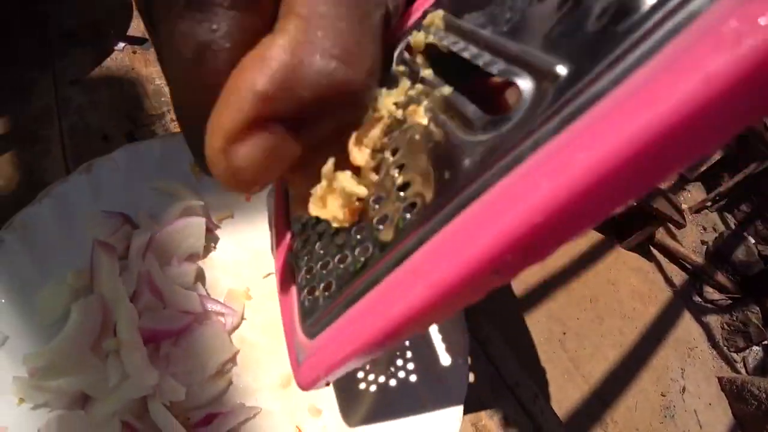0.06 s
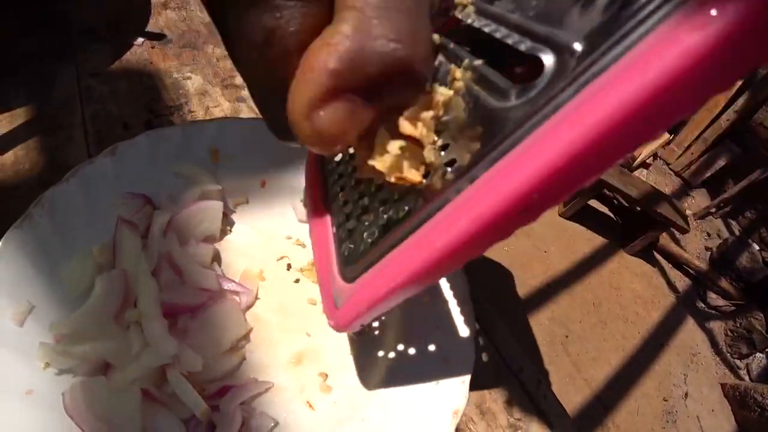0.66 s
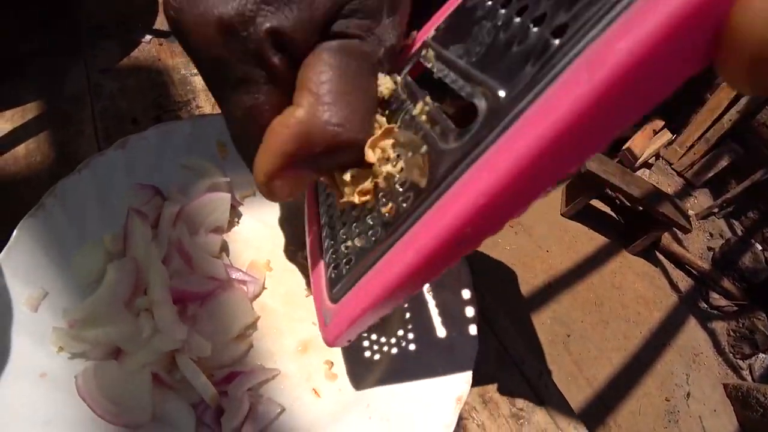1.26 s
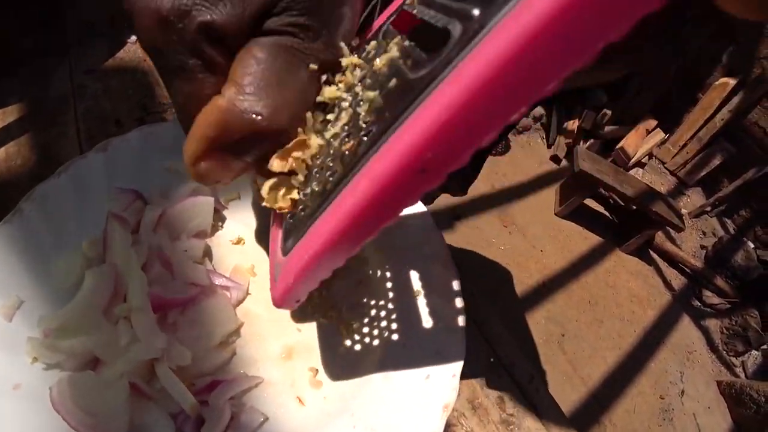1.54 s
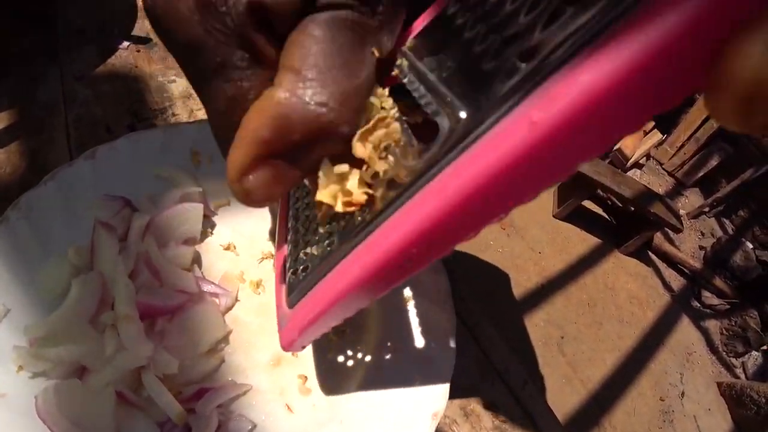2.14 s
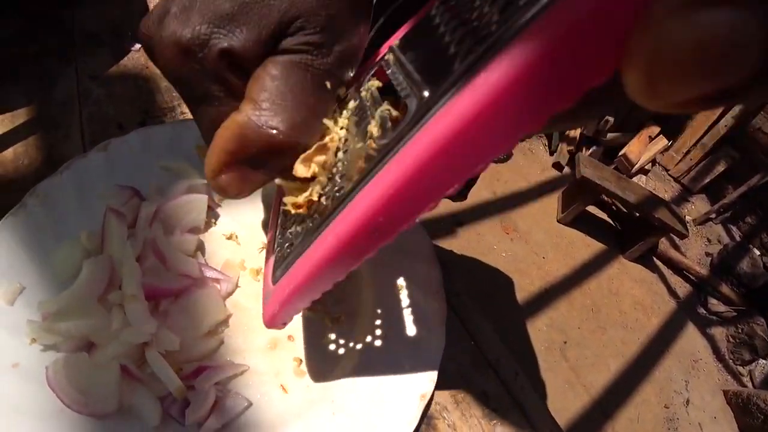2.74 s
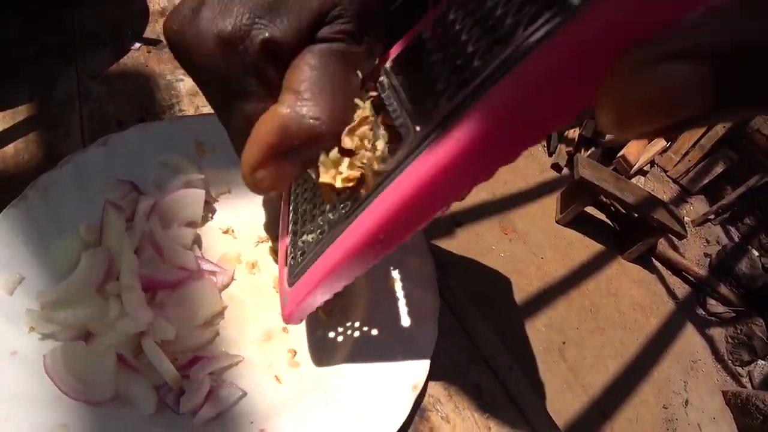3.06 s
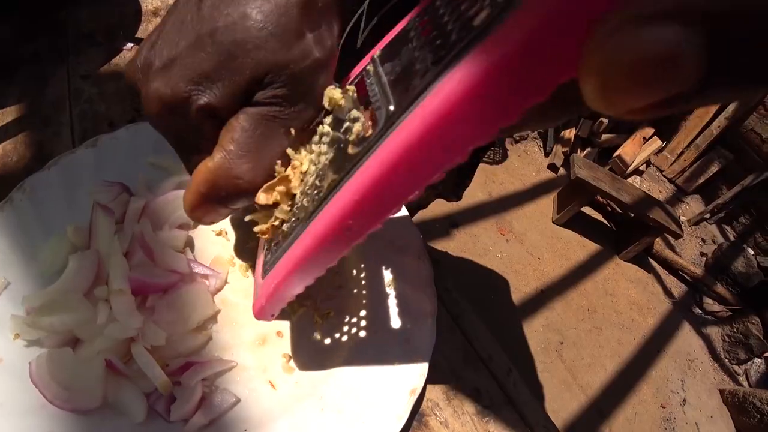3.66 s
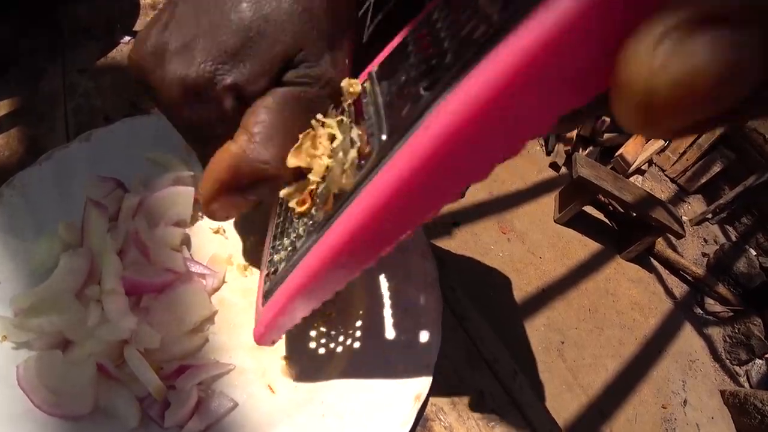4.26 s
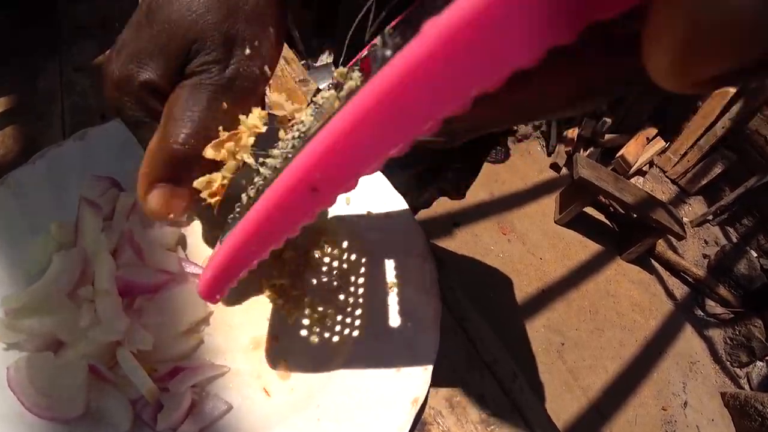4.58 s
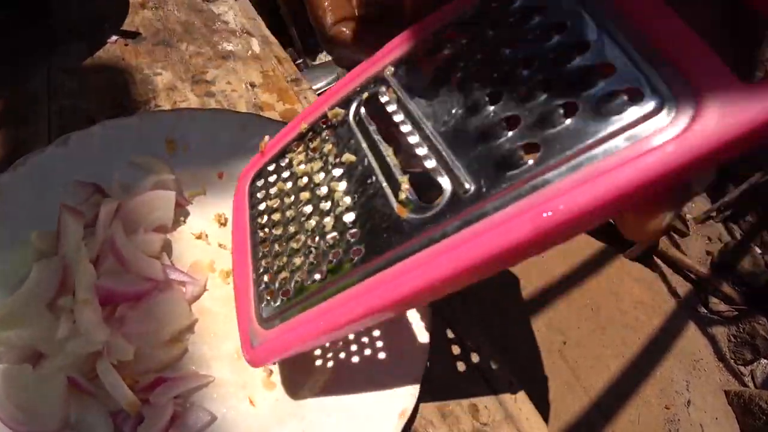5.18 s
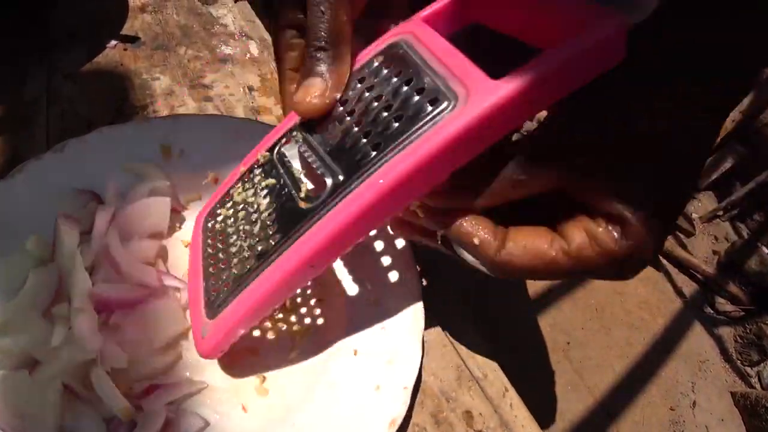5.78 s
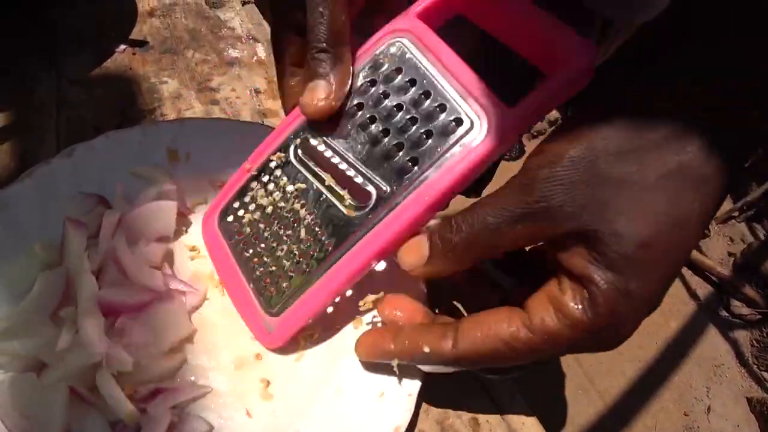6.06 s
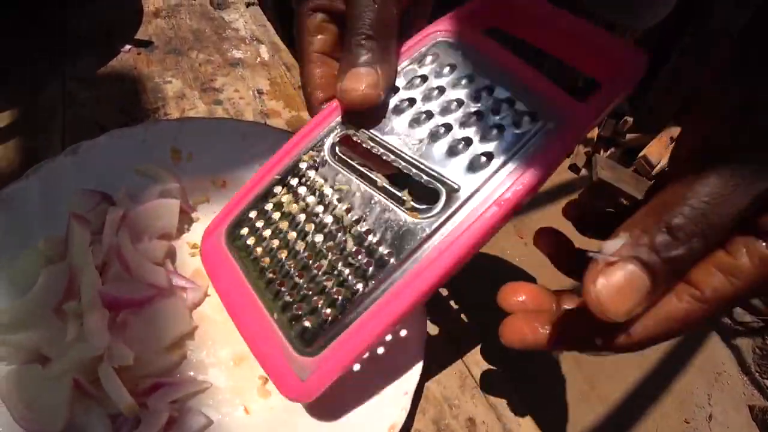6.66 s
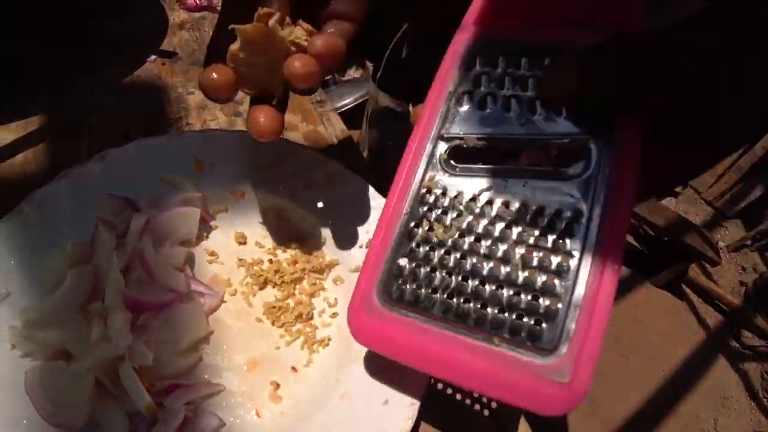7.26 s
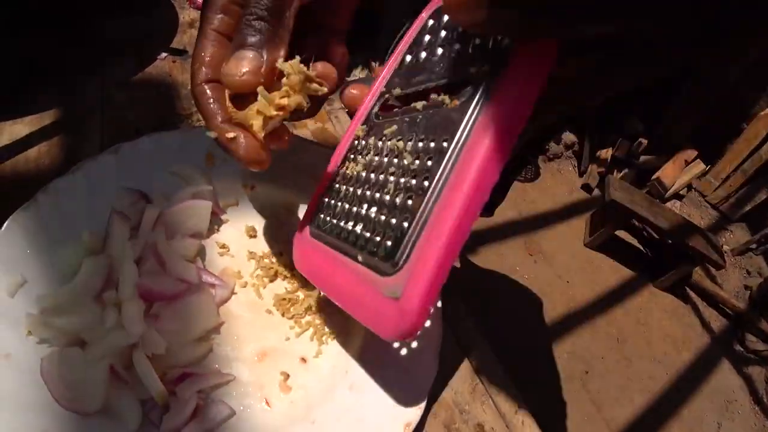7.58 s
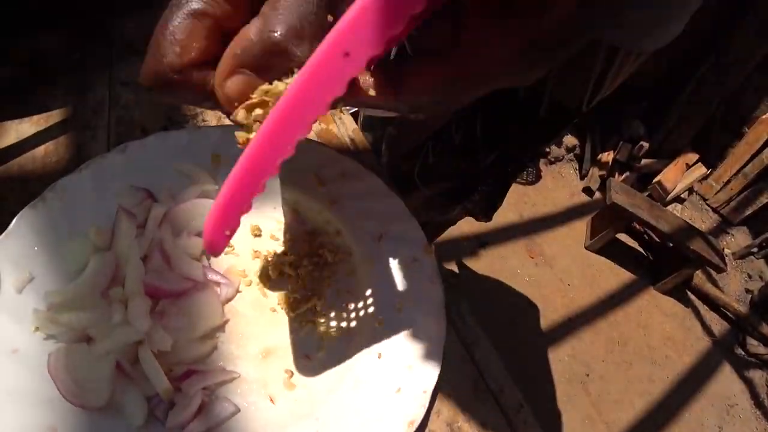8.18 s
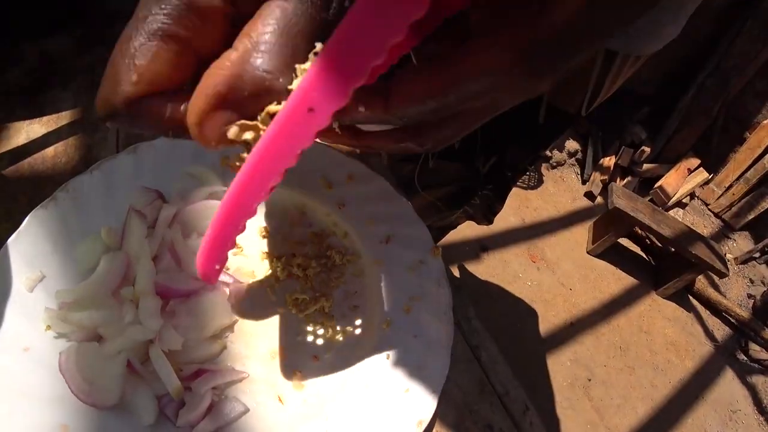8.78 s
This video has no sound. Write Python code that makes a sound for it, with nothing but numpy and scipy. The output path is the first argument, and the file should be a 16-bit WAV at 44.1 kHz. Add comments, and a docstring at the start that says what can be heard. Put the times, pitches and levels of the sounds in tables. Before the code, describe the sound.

Close to the microphone and slightly left, a lump of root is rubbed up and down a plastic-framed steel grater in quick, crunchy rasps. The strokes soften and stop. The grater is knocked four times, making the plate bump on a wooden table and loose metalware rattle and ring. Wet shreds crackle faintly, then the grating resumes gently. A quiet outdoor rumble and a faint steady whirr lie behind.

```python
"""Outdoors at a wooden table, microphone close, the work a little to the left. A lump of root is rubbed up
and down a plastic-framed steel grater over a plate: fine teeth snap its fibres, the sheet rings, the frame
purrs. The grater is knocked four times to shake the shreds off: the plate hops, the table sways, and loose
metalware rattles and rings. Then the grating starts again, gently at first. Behind it all lie a quiet
rumble of open air and a steady whirr."""
import sys
import numpy as np
from scipy import signal
from scipy.fft import rfft, irfft, next_fast_len
from scipy.io import wavfile
from scipy.ndimage import map_coordinates

SR = 44100
rng = np.random.default_rng(int(sys.argv[2]) if len(sys.argv) > 2 else 0)


def put_to_file(sound):
    """Save the sound as 16-bit audio at rate SR, in the file named by the first command-line argument."""
    columns = np.atleast_2d(sound).T  # one column per channel
    safe = np.clip(columns, -1, 1)
    whole_steps = np.round(safe * 32767)
    wavfile.write(sys.argv[1], SR, whole_steps.astype(np.int16))


N = 388962

# each up-and-down of the hand, a light return and then a cutting push:
# (return peak [s], return level [dB], bite [s], push length [s], push level [dB], catch [0-1])
HAND_STROKES = [(-0.002, -37, 0.076, 0.06, -32, 0.13), (0.239, -39.5, 0.302, 0.087, -27.5, 0.3),
                (0.477, -36.5, 0.554, 0.091, -29.5, 0.43), (0.721, -36, 0.784, 0.0869, -29, 0.82),
                (0.95, -39, 1.026, .067, -29.5, 0.03), (1.182, -43, 1.252, .036, -32.5, 0.81),
                (1.413, -46, 1.470, 0.096, -30, 0.97), (1.643, -41, 1.724, 0.085, -32.5, 0.02),
                (1.887, -35, 1.951, 0.092, -29, 0.54), (2.123, -38, 2.196, 0.08, -29.5, .5),
                (2.358, -37.5, 2.431, .052, -32, 0.06), (2.587, -45.5, 2.652, 0.076, -32, 0.36),
                (2.809, -40.5, 2.884, 0.079, -32.5, 0.08), (3.04, -38.5, 3.115, 0.0945, -33.5, 0.73),
                (3.286, -39.5, 3.361, 0.075, -33.5, .8), (3.533, -42.5, 3.599, 0.073, -33.5, 0.14),
                (3.752, -45.5, 3.816, 0.075, -35.5, 0.15), (3.967, -42, 4.035, 0.076, -34.5, 0.17),
                (4.191, -41, 4.252, 0.049, -36, 0.53), (4.417, -52.5, 4.488, 0.082, -35.5, 0.16),
                (8.021, -73, 8.092, 0.072, -50, 0.1), (8.242, -52.5, 8.333, 0.065, -42.5, 0.07),
                (8.509, -48, 8.577, 0.092, -35, 0.33), (8.749, -43, 8.795, .06, -43.5, .2)]
# the lump jams on a row of teeth and tears free: (time [s], level [dB])
JAMS = [(0.094, -20), (0.11, -16.5), (0.339, -15), (0.5402, -24), (1.017, -25), (1.059, -20), (1.273, -14),
        (1.491, -22), (1.937, -35), (2.462, -19), (3.3403, -18.5), (8.6107, -22)]
# how the grater is held: (time [s], tilt [0-1], coupling to the plate [dB], thud [dB], treble [dB])
GRATER_POSE = [(.55, 0, -1, 5, -3), (1.1, 0.2, -26, 1, -0.5), (2.2, 1, -16, 0.5, -2.5),
               (2.7, 0.92, -18, 0, 1.5), (3.3, 1, -16, -0.5, 0.5), (4.501, 0.98, -12, 1, 1),
               (8.3, 0, 3, -2.5, -0.5)]
# the frame hits and bounces: (time [s], level [dB], edge at 5 kHz [dB])
FRAME_HITS = [(5.816, -1.5, -6), (6.1074, -2.5, -2.5), (6.1284, -6, -1), (6.147, -11.5, -8.5),
              (6.355, -4, 2), (6.359, -12.5, -8), (6.3753, -5, -2), (6.382, -11.5, 1), (6.5751, 0, -5),
              (6.5978, -7.5, 3.5), (6.6017, -7, 1.5)]
# the plate bumps on the wood, dropping back after a knock or pressed by the grater while grating: (time [s],
# level [dB])
PLATE_BUMPS = [(5.837, -26), (5.8735, -15.5), (5.907, -22.5), (6.39, -19), (6.584, -18), (6.6237, -19.5),
               (8.1, -36), (8.113, -39), (8.585, -33), (8.618, -24)]
# loose metal chatters: (time [s], buzz level [dB], ring level [dB], favoured pitch [Hz])
METAL_FLURRIES = [(5.897, -38, -36.5, 2700), (5.933, -32.5, -43, 2650), (5.957, -36, -34.5, 3450),
                  (6.432, -34.5, -41, 1310), (6.466, -32.5, -34.5, 1270), (6.497, -41, -48, 1328),
                  (6.622, -29.5, -26.5, 1200), (6.652, -27.5, -26, 2450), (6.675, -27, -29, 1220),
                  (6.692, -30, -28.5, 2450), (6.716, -34, -34.5, 1220)]
# the hand shifts its grip: (time [s], length [s], level [dB])
GRIP_SHIFTS = [(5.13, 0.1, -51), (6.982, 0.04, -54)]
# wet shreds are touched and dropped: (time [s], level [dB])
SHRED_TOUCHES = [(0.66, -62), (4.75, -68), (7.216, -56), (7.232, -46), (7.276, -56), (7.306, -56),
                 (7.5, -54), (8.133, -54), (8.205, -48.5)]

# modes of the struck frame and of the metal's buzzing contact: (frequency [Hz], width [Hz], level [dB])
FRAME_MODES = [(312, 25, -7), (487, 28, -4), (700, 65, 1.5), (760, 32, -1), (874, 37, -0.5), (1117, 66, -5),
               (1400, 450, -2), (1840, 140, 6), (2030, 180, -1), (2870, 290, -3), (3760, 320, -25),
               (5000, 590, -19)]
BUZZ_MODES = [(493, 990, -0.5), (1240, 105, 1), (1890, 190, 2), (2540, 830, -2), (3470, 330, -3.5),
              (4600, 220, -5), (5560, 280, -9), (6960, 260, -12), (8220, 170, -18), (10200, 190, -24)]
# modes of the metalware: (frequency [Hz], level [dB], t60 [s])
METAL_MODES = [(497.6, -0.5, 0.35), (631, -5, 0.29), (805, 2, 0.21), (1047, -6.5, .3), (1220, -0.5, 0.15),
               (1270, 0.5, 0.23), (1500, -13, 0.58), (2040, -13.5, 0.51), (2290, -13, 0.6), (2460, 3, 0.18),
               (2510, -6.5, 0.3), (2606, -15, 0.62), (2793, -13, 0.62), (3200, -23, 0.76),
               (3360, -4.5, 0.27), (3720, -28, 0.27), (4330, -7.5, 0.2), (4460, -20, .15), (7100, -19, .12)]
# how the knocked table dies away: (frequency [Hz], t60 [s])
TABLE_DECAY = [(200, 0.22), (700, 0.15), (2000, 0.16), (5000, 0.16), (10000, 0.078)]
# torn fibres, flexing frame, knocked table, bumped plate, open air: (frequency [Hz], level [dB])
RASP_SPECTRUM = [(150, -25), (250, -2.5), (482, -10), (886, -4.5), (976, -1.5), (1110, -5), (1410, -4),
                 (1790, -1), (2430, -6), (2810, -4.5), (3750, -6.5), (4920, -5), (5870, -10),
                 (10600, -22.5), (11500, -30.5), (15000, -64), (22000, -120)]
THUD_SPECTRUM = [(25, -27), (50, -22), (75, -3), (100, -1.5), (140, -2), (220, -5.5), (320, -12),
                 (600, -27), (2000, -81)]
CLATTER_SPECTRUM = [(88, -10.5), (150, -3), (232, -39), (310, 4), (430, -5.5), (728, 0.5), (973, -16.5),
                    (1980, -5.5), (2410, -14), (3060, -11), (4390, -21.5), (5360, -23.5), (11500, -20),
                    (15000, -80), (22000, -120)]
PLATE_BUMP_SPECTRUM = [(60, 0), (200, -14.5), (340, 4.5), (600, -3), (1000, -17.5), (2000, -28.5), (8000, -62)]
AIR_SPECTRUM = [(12, -36), (20, 3), (122, -6.5), (143, -17), (182, -5), (213, -10.5), (243, -7), (301, -11),
                (499, -14.5), (872, -21.5), (1300, -17), (1700, -19), (2040, -22.5), (10600, -37.5),
                (11500, -38.5), (15000, -74), (22000, -120)]
# where the work sits at the microphone: (frequency [Hz], left minus right [dB])
LEFT_BIAS = [(110, -0.5), (300, 0.6), (550, 1), (1100, 3), (2000, 4.5), (4000, 4.5), (8000, 3), (11500, 1)]
# left-right likeness of close and distant sound: (frequency [Hz], coherence [clipped to 0-1 in use])
CLOSE_COHERENCE = [(150, 1), (500, 0.89), (1200, 0.37), (2000, 0.89), (4000, 0.95), (11000, 0.74)]
DISTANT_COHERENCE = [(60, 1), (170, 0.9), (500, 0.2), (1420, -1.2), (4090, -0.78), (11800, 0.29)]

GRAZE_S, RETURN_RISE_S, RETURN_FALL_S = 0.0276, 0.048, 0.037


def grating():
    """Close up, snapping fibres excite the steel sheet; passing rows of teeth make the frame purr."""
    force, thud, treble, speed = hand_pressure(push_lag_s=0.011, return_lag_s=0.0027)
    pose_s, *pose = np.transpose(GRATER_POSE)
    tilt, coupling_db, thud_db, treble_db = [np.interp(clock(), pose_s, column) for column in pose]
    thud, treble = thud * amp(thud_db), treble * amp(treble_db)
    rows = tooth_rows(speed, hz=102.9, unsteady=0.0977)
    force = force + amp(np.interp(clock(), [1.1, 4.55, 4.6], [-56, -62, -100]))  # touch between strokes
    sliding, tear = snagging(stick_s=0.0086, hush=0.78, t60=0.027)
    cutting = sliding * teeth(per_s=125, jitter=0.4, scatter_db=3, t60=0.049, depth=1.5)
    cutting *= 1 + 0.095 * rows
    grain = spread(fibres(per_s=5500, scatter_db=3, hiss=0.84), RASP_SPECTRUM, CLOSE_COHERENCE)
    dull = filtered(grain, lambda f: 1 / (1 + (f / 3600) ** 4))
    burst = amp(-10) * tear
    rasp = dull * (amp(-1.14) * force * cutting + burst)
    rasp += (grain - dull) * (amp(3.5) * treble * cutting + burst)
    mode = lambda hz, width, db: filtered(rasp, lambda f: amp(db) * resonance(f, hz, width))
    # the sheet's main resonance sinks as the grater is tilted
    ring = (1 - tilt) * mode(hz=2070, width=260, db=3) + tilt * mode(hz=1720, width=176, db=-3)
    ring += mode(hz=2710, width=270, db=-10.5) + (1 - tilt) * mode(hz=4170, width=580, db=-11)
    plate = mode(hz=250, width=60, db=-5.5) + mode(hz=460, width=61, db=3.5)
    plate += mode(hz=607, width=100, db=-3)
    flex = spread(rng.standard_normal((2, N)), THUD_SPECTRUM, [(100, 0.98)])
    frame = thud * (amp(-1.5) * unit(rows) + amp(-5) * flex) + amp(-26.5) * tear * flex
    return amp(-1.33) * (steel_sheet(rasp, t60=0.024, db=-5.5) + ring + amp(coupling_db) * plate) + frame


def hand_pressure(push_lag_s, return_lag_s, slowest=0.57, variety=0.25):
    """Rasp, thud and treble strength, and hand speed; the frame flexes a moment after each stroke."""
    t, speed = clock(), np.full(N, slowest)
    rasp, thud, treble = np.zeros((3, N))
    for return_s, return_db, bite_s, length, push_db, catch in HAND_STROKES:
        near = slice(max(int(bite_s * SR) - SR // 5, 0), int(bite_s * SR) + SR // 5)
        return_t, push_t = t[near] - return_s, t[near] - bite_s
        back = return_db, -0.5, return_swell(return_t), return_swell(return_t - return_lag_s)
        down = push_db, 0, push_swell(push_t, length, catch), push_swell(push_t - push_lag_s, length, catch)
        for db, treble_db, force, flex in (back, down):
            rasp[near] += amp(db) * force
            thud[near] += amp(-39.5 + 0.74 * (db + 34)) * flex  # grows more slowly than the rasp
            treble[near] += amp(db + treble_db) * force
            speed[near] += (np.exp(variety * rng.standard_normal()) - slowest) * force
    return rasp, thud, treble, speed


def push_swell(t, length, catch, attack_s=0.0011):
    """A push grazes, bites at t = 0, swells and lets go; the harder it catches, the less it grazes."""
    graze = 0.559 * (1 - catch)
    return np.interp(t, [-GRAZE_S, 0, attack_s, 0.42 * length, length], [0, graze, 0.64, 1, 0])


def return_swell(t):
    """A return only swells and eases, peaking at t = 0."""
    return np.sin(np.pi / 2 * np.interp(t, [-RETURN_RISE_S, 0, RETURN_FALL_S], [0, 1, 0])) ** 1.2


def fibres(per_s, scatter_db, hiss):
    """Tiny snaps of breaking fibres on a bed of sliding friction."""
    snaps = (rng.random(N) < per_s / SR) * amp(scatter_db * rng.standard_normal(N).clip(-2, 2))
    return unit(snaps * rng.standard_normal((2, N))) + hiss * rng.standard_normal((2, N))


def teeth(per_s, jitter, scatter_db, t60, depth):
    """Tooth after tooth bites at an uneven rate, each a short surge of cutting."""
    gaps, sizes = rng.standard_normal((4000, 2)).T
    onsets = (np.cumsum(np.exp(jitter * gaps)) / per_s * SR).astype(int)
    bites = np.bincount(onsets, amp(scatter_db * sizes.clip(-2, 2)), N)[:N]
    surge = signal.fftconvolve(bites, fade(clock()[:SR // 10], t60))[:N]
    return unit(1 + depth * unit(surge))


def tooth_rows(speed, hz, unsteady):
    """One uneven push for every row of teeth that the lump crosses."""
    rate = hz * speed * np.exp(unsteady * wobble(90))
    return np.sin(2 * np.pi * np.cumsum(rate) / SR) * amp(1.9 * wobble(76))


def snagging(stick_s, hush, t60, tear_db=10.5):
    """The rasp dips while the lump sticks, then bursts as it tears free: at each bite and each jam."""
    t, sliding, tear = clock()[:SR // 10], np.ones(N), np.zeros(N)
    dip = np.abs(np.sin(np.pi * np.minimum(t / stick_s, 1))) ** 0.5
    bites = [(s, catch, catch * amp(db + tear_db)) for _, _, s, _, db, catch in HAND_STROKES]
    for s, catch, size in bites + [(s, 1, amp(db)) for s, db in JAMS]:
        add(sliding, s - stick_s, -hush * catch ** 0.15 * dip)
        add(tear, s + 0.001, size * fade(t, t60) * rise(t, 0.0002))
    return sliding, tear


def steel_sheet(rasp, t60, db):
    """The sheet's many close modes colour the rasp; the moving lump retunes them for every stroke."""
    out, t = rasp.copy(), clock()[:SR // 20]
    turns = [(return_s - RETURN_RISE_S, bite_s - GRAZE_S) for return_s, _, bite_s, *_ in HAND_STROKES]
    edges = np.unique(np.append(np.maximum(turns, 0), [0, N / SR]))
    for start, end in zip(edges, edges[1:]):
        modes = rng.standard_normal(len(t)) * fade(t, t60)
        stroke = rasp[:, round(start * SR):round(end * SR)]
        add(out, start, signal.fftconvolve(stroke, amp(db) * modes[None] / np.linalg.norm(modes), axes=1))
    return out / np.hypot(1, amp(db))


def knocks():
    """Each contact cracks, rings the plastic frame and stirs the table."""
    out, t = np.zeros((2, N)), clock()[:SR // 5]
    for s, db, edge_db in FRAME_HITS:
        chance = rng.standard_normal((len(FRAME_MODES), 2))
        modes = lambda f: sum(amp(level + stray_db) * resonance(f, hz * (1 + 0.0033 * detune), width)
                              for (hz, width, level), (stray_db, detune) in zip(FRAME_MODES, chance))
        ring = unit(filtered(1.0 * (t == 0), modes))
        # waves run to and fro in the frame, so each clack lasts some milliseconds
        scatter = rng.standard_normal((2, len(t))) * fade(t, 0.019)
        echoes = unit(signal.fftconvolve(scatter + 0.57 * scatter.sum(0), ring[None], axes=1)[:, :len(t)])
        direct = filtered(ring, lambda f: 1 / (1 + 1j * f / 5500) ** 2)  # soft plastic rounds the blow
        stir = table_clatter()[:, :len(t)] * rise(t, 0.0043)
        blow = amp(-26.5) * echoes - amp(-30) * direct + amp(-17.5) * stir
        contact = [(2500, 0), (5000, edge_db), (7000, edge_db - 7), (9000, edge_db - 16.5)]
        add(out, s, amp(db) * filtered(blow, lambda f: amp(along(contact, f))))
    return out


def table_clatter():
    """Dense wood and plate modes, each band dying at its own speed."""
    noise = spread(rng.standard_normal((2, 16384)), CLATTER_SPECTRUM, CLOSE_COHERENCE)
    hz, t, bands = signal.stft(noise, SR, nperseg=128)
    return signal.istft(bands * fade(t, along(TABLE_DECAY, hz)[:, None]), SR, nperseg=128)[1]


def plate_bumps():
    """The plate bumps on the wood with a short low ring."""
    out, bump = np.zeros(N), np.pad(click(PLATE_BUMP_SPECTRUM), (0, SR // 8))
    thump = filtered(bump, lambda f: 1 + 1.55 * resonance(f, hz=309, width=14))
    for s, db in PLATE_BUMPS:
        add(out, s, -amp(db) * thump / np.abs(thump).max())
    return out


def metal_rattles(taps_per_s=600):
    """Loose metal buzzes in short flurries of tiny taps, each flurry pumping up its ringing modes."""
    out, t = np.zeros((2, N)), clock()[:SR * 3 // 4]
    hz, level, t60 = np.transpose(METAL_MODES)[:, :, None]
    contact = lambda f: sum(amp(db) * resonance(f, centre, width) ** 2 for centre, width, db in BUZZ_MODES)
    for s, buzz_db, ring_db, favoured_hz in METAL_FLURRIES:
        emphasis_db = -9 * np.tanh(3.1 * np.abs(np.log2(hz / favoured_hz)))
        strength = amp(level + emphasis_db + 0.71 * rng.standard_normal(hz.shape))
        phase = 2 * np.pi * rng.random(hz.shape) + 0.49 * rng.standard_normal((2, *hz.shape))
        detuned = hz * (1 + 0.00193 * rng.standard_normal(hz.shape))
        ring = np.sum(strength * np.sin(2 * np.pi * detuned * t + phase) * fade(t, t60), axis=1)
        # countless weaker modes blur into a shimmer
        shimmer = noise_band((2, len(t)), hz=2700, width=820, order=3) * fade(t, 0.42)
        ring = (ring + amp(-22) * shimmer) * rise(t, 0.0092)
        taps = (rng.random(len(t)) < taps_per_s / SR) * (1 + 0.31 * rng.standard_normal((2, len(t))))
        buzz = unit(filtered(taps, contact)) * fade(t, 0.15) * rise(t, 0.0016)
        add(out, s, amp(ring_db + 3) * ring + amp(buzz_db + 1.5) * buzz)
    return out


def table_sway(hz, t60, db, rumble_db):
    """The table rocks and its boards rumble after each knock."""
    out, t = np.zeros(N), clock()[:2 * SR]
    boards = lambda f: resonance(f, hz=74.6, width=39) ** 2 + 1.03 * resonance(f, hz=178.4, width=23) ** 2
    rocking = amp(db) * np.sin(2 * np.pi * hz * t) * fade(t, t60)
    times = np.array(FRAME_HITS)[:, 0]
    for s in times[np.diff(times, prepend=0) > 0.1]:  # the first contact of each knock
        out[round(s * SR):] *= fade(clock()[:N - round(s * SR)], 0.1)  # it stops the old motion
        rumble = unit(filtered(rng.standard_normal(len(t)), boards)) * fade(t, 0.83)
        add(out, s, rocking + amp(rumble_db) * rumble)
    return out


def handling():
    """Soft bumps of the grip and faint crackles of wet shreds, close to the microphone."""
    t, touch = clock(), np.zeros(N)
    grip = sum(amp(db) * np.exp(-(2 * (t - s) / length) ** 2) for s, length, db in GRIP_SHIFTS)
    for s, db in SHRED_TOUCHES:
        add(touch, s, amp(db) * fade(t[:SR // 4], t60=0.077))
    crackle = spread(fibres(per_s=2700, scatter_db=-2, hiss=0.65), RASP_SPECTRUM, CLOSE_COHERENCE)
    crackle = filtered(crackle, lambda f: 1 / (1 + (f / 5000) ** 4) + resonance(f, hz=4050, width=400))
    return grip * noise_band(N, hz=69.6, width=33) + touch * unit(crackle)


def yard():
    """Farther off, a quiet outdoor rumble and a steady narrow whirr."""
    air = spread(rng.standard_normal((2, N)), AIR_SPECTRUM, DISTANT_COHERENCE)
    air *= amp(-52.5 + 1.14 * wobble(15))
    return air + amp(-61) * noise_band((2, N), hz=1344, width=210, order=2)


def amp(db):
    """Decibels to gain."""
    return 10 ** (np.asarray(db) / 20)


def unit(x):
    """Scale to rms 1."""
    return x / np.sqrt(np.mean(x ** 2) + 1e-20)


def clock():
    """The time of every sample."""
    return np.arange(N) / SR


def along(points, hz):
    """(frequency [Hz], value) points read on a log axis."""
    f, values = np.transpose(points)
    return np.interp(np.log(hz + 1), np.log(f + 1), values)


def filtered(x, response):
    """Shape x by a frequency response."""
    n = x.shape[-1]
    padded = next_fast_len(n + SR // 4)
    return irfft(rfft(x, padded) * response(np.fft.rfftfreq(padded, 1 / SR)), padded)[..., :n]


def resonance(f, hz, width):
    """Causal response of one damped mode."""
    return 1j * f * width / (hz * hz - f * f + 1j * f * width)


def noise_band(shape, hz, width, order=1):
    """Noise through a resonance, at rms 1."""
    return unit(filtered(rng.standard_normal(shape), lambda f: resonance(f, hz, width) ** order))


def click(spectrum, size=2048):
    """The shortest causal pulse that has this spectrum."""
    cepstrum = irfft(along(spectrum, np.fft.rfftfreq(size, 1 / SR)) * np.log(10) / 20)
    fold = 1 + np.sign(size / 2 - np.arange(size))
    fold[0] = 1
    return irfft(np.exp(rfft(cepstrum * fold)))


def rise(t, attack_s):
    """Exponential onset from 0 to 1."""
    return 1 - np.exp(-t / attack_s)


def fade(t, t60):
    """Exponential decay that starts at t = 0."""
    return (t >= 0) * np.exp(-np.log(1000) * np.abs(t) / t60)


def wobble(per_s):
    """A smooth random curve with per_s knots a second."""
    knots = rng.standard_normal(int(N * per_s / SR) + 4)
    return map_coordinates(knots, [np.arange(N) * per_s / SR], order=2)


def add(track, s, sound):
    """Mix a sound into a track at time s."""
    part = track[..., round(s * SR):][..., :sound.shape[-1]]
    part += sound[..., :part.shape[-1]]


def spread(pair, spectrum, coherence):
    """Two unrelated signals become a coloured, partly coherent stereo pair of rms 1."""
    turn = lambda f: np.arccos(np.clip(along(coherence, f), 0, 1)) / 2
    shares = lambda f: np.array([np.cos(turn(f)), np.sin(turn(f))])
    mid, side = filtered(pair, lambda f: amp(along(spectrum, f)) * shares(f))
    return unit(np.array([mid + side, mid - side]))


def scene():
    """The work goes on close by, a little left of the microphone, with the yard behind."""
    work = grating() + handling() + knocks() + plate_bumps() + metal_rattles()
    work += table_sway(hz=27.8, t60=1.84, db=-36.5, rumble_db=-38)
    return filtered(work, lambda f: amp(np.array([[0.5], [-0.5]]) * along(LEFT_BIAS, f))) + yard()


def record(dry, ceiling=0.75, top_hz=11200):
    """The camera microphone rounds off the loudest peaks and keeps nothing above its band limit."""
    rounded = dry / (1 + (dry / ceiling) ** 4) ** (1 / 4)
    return filtered(rounded, lambda f: 1 / (1 + (f / top_hz) ** 120))


dry = scene()
out = record(dry)
put_to_file(out)
```